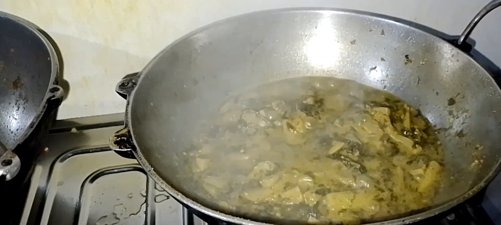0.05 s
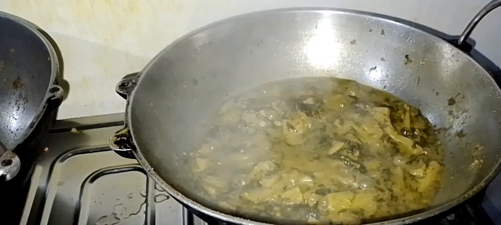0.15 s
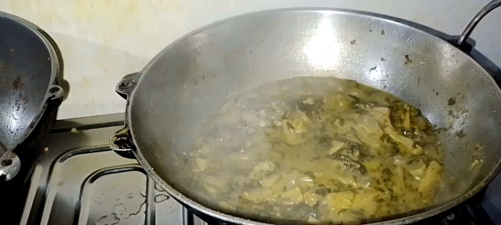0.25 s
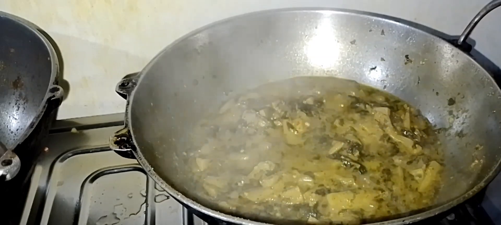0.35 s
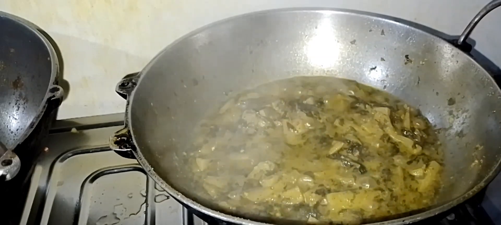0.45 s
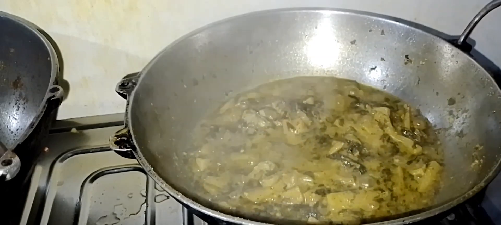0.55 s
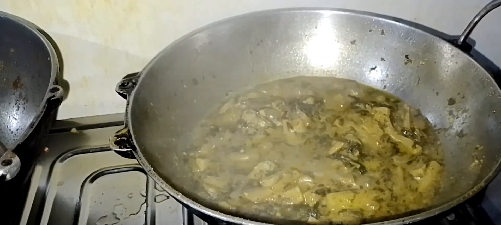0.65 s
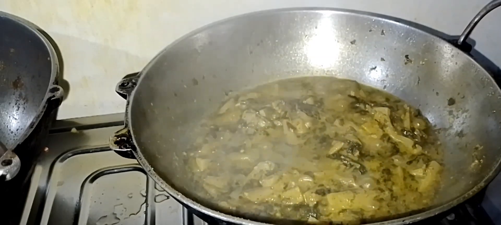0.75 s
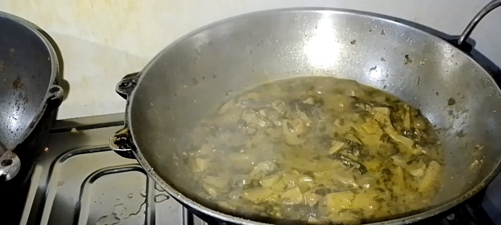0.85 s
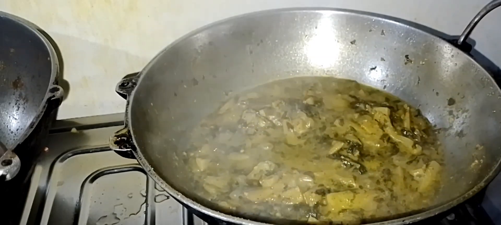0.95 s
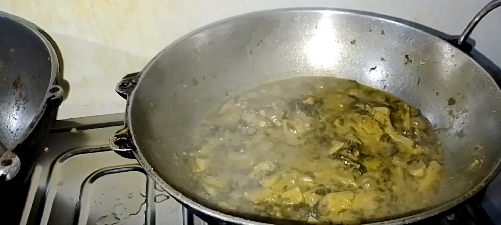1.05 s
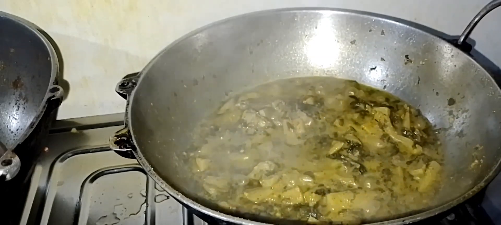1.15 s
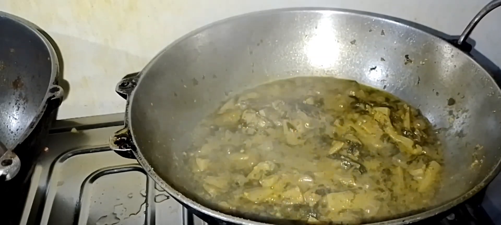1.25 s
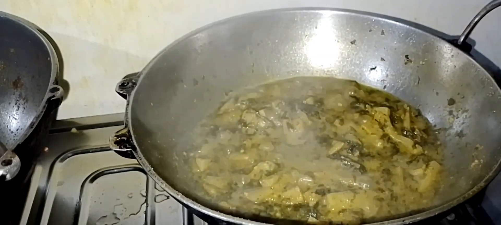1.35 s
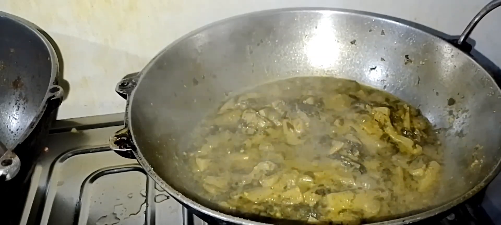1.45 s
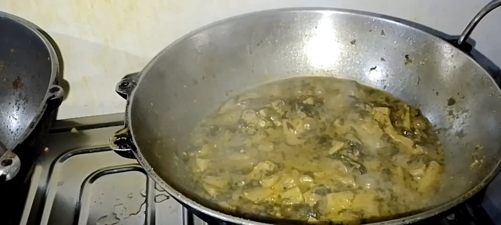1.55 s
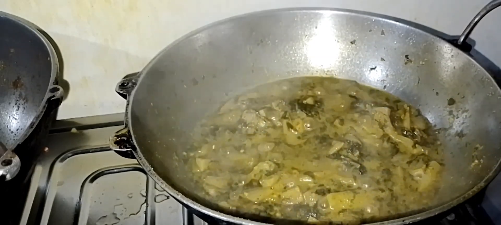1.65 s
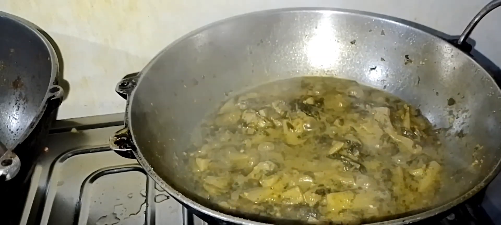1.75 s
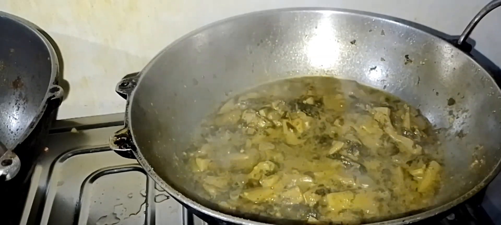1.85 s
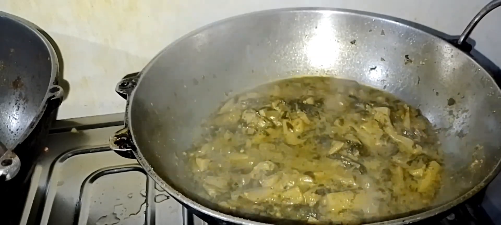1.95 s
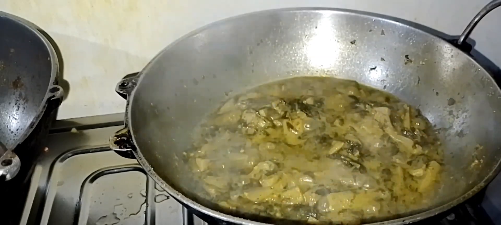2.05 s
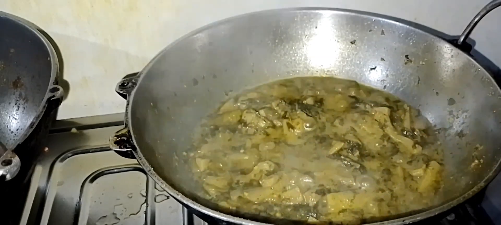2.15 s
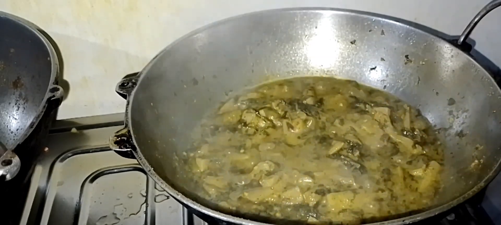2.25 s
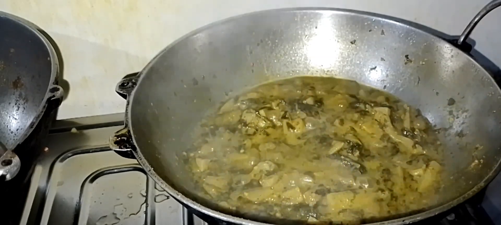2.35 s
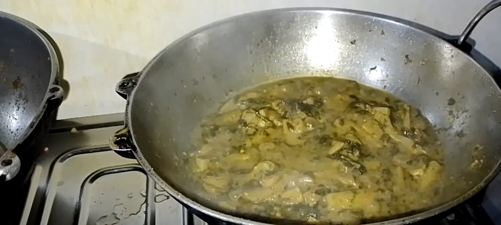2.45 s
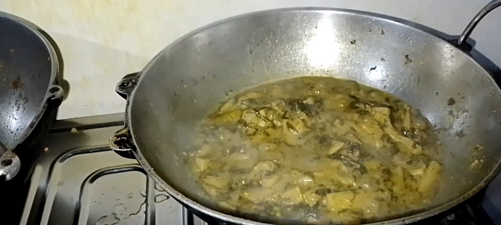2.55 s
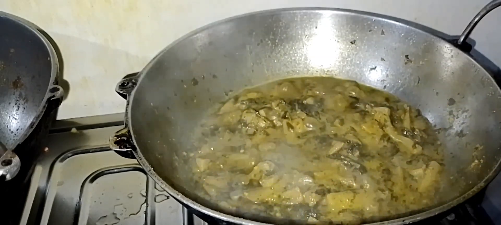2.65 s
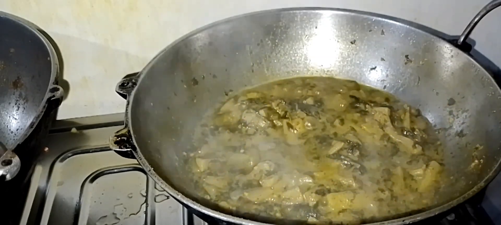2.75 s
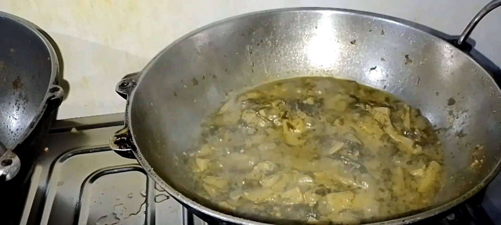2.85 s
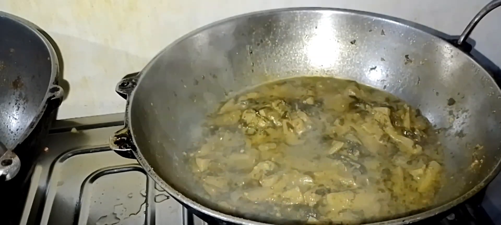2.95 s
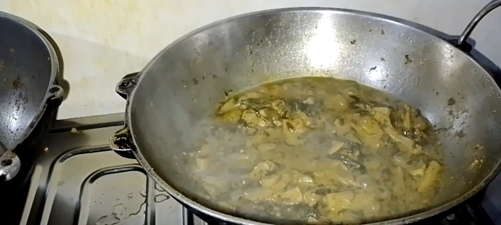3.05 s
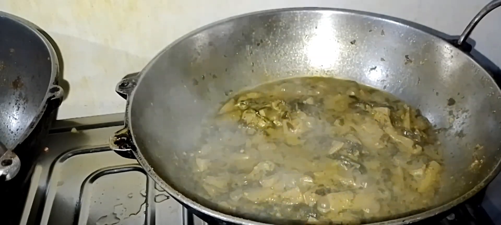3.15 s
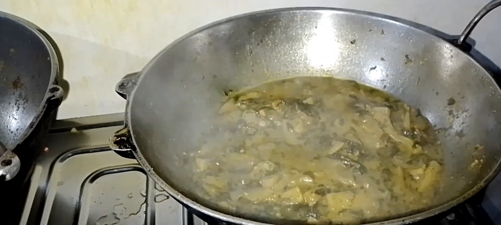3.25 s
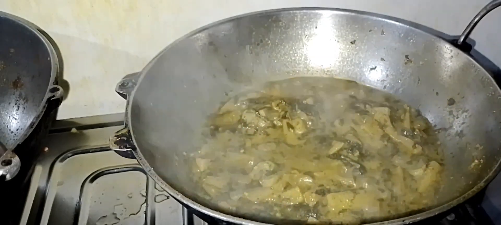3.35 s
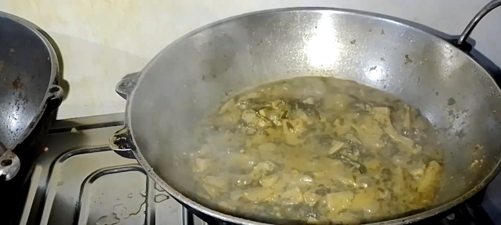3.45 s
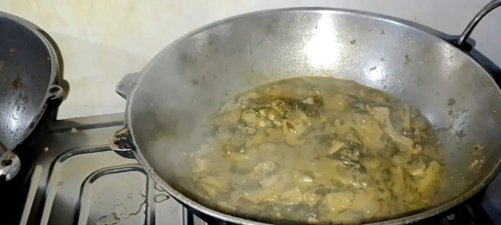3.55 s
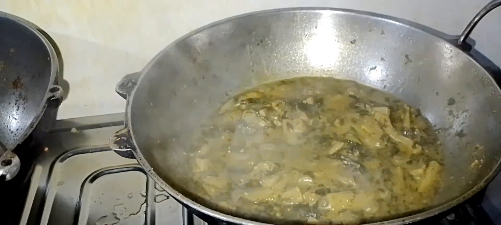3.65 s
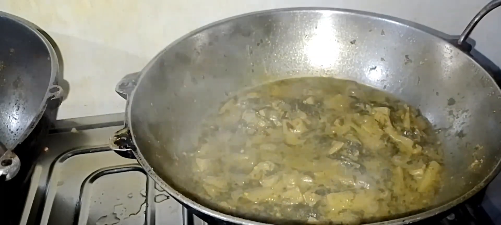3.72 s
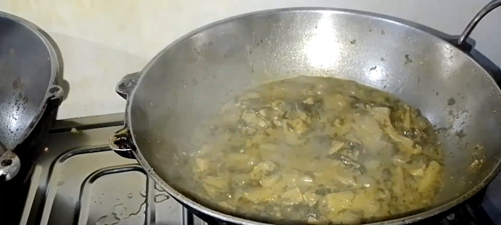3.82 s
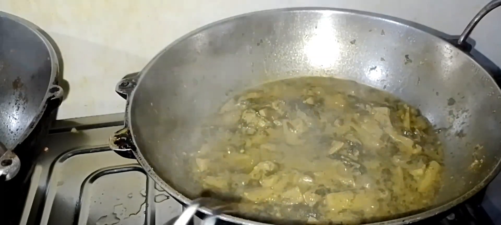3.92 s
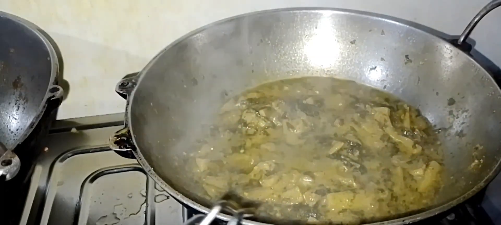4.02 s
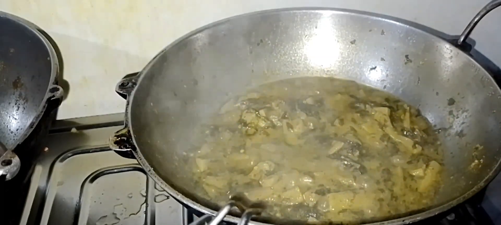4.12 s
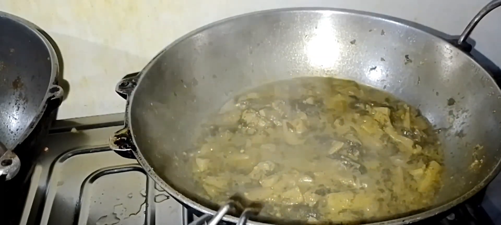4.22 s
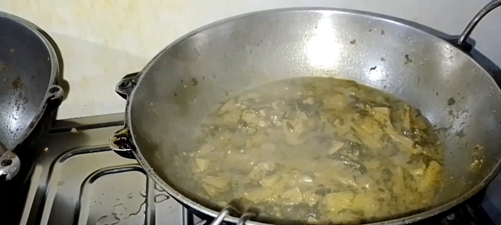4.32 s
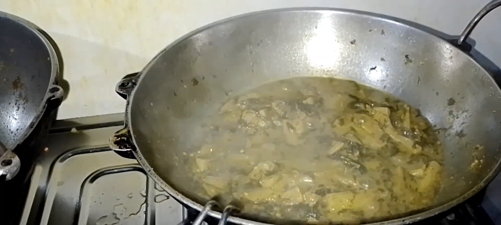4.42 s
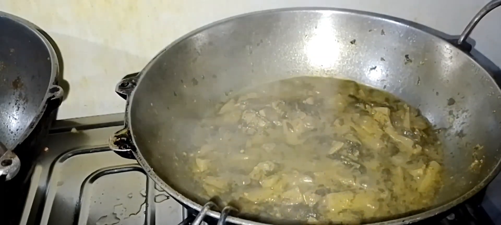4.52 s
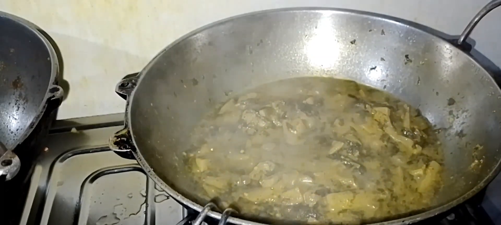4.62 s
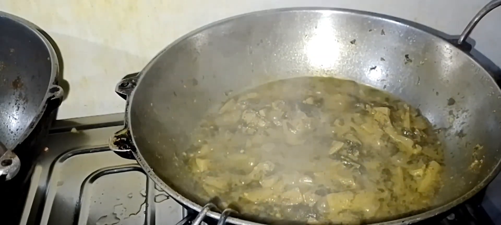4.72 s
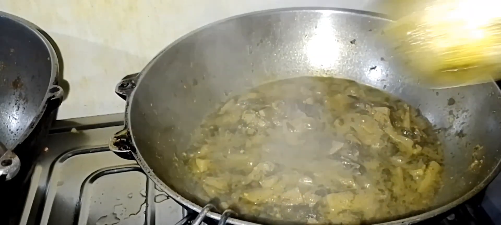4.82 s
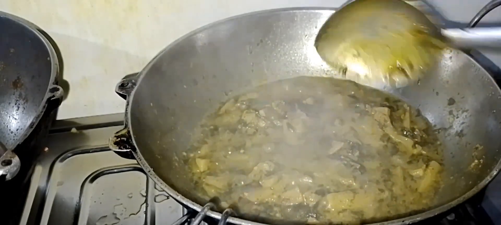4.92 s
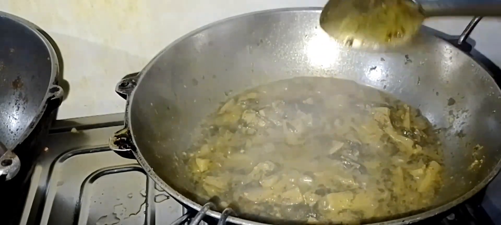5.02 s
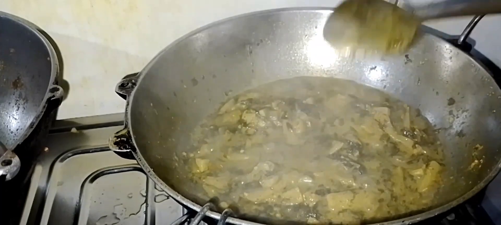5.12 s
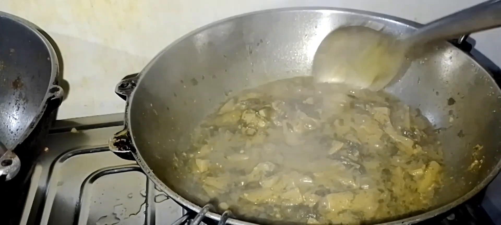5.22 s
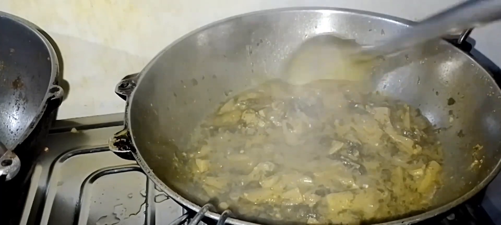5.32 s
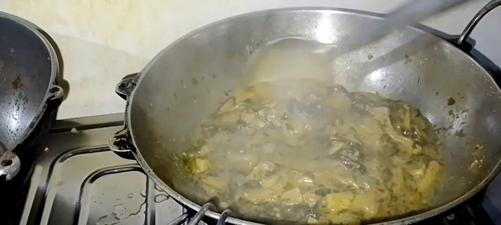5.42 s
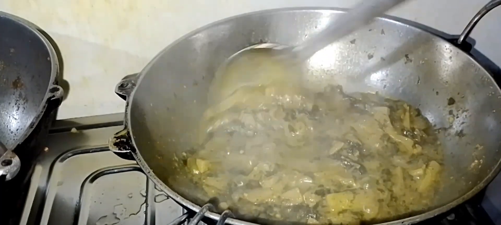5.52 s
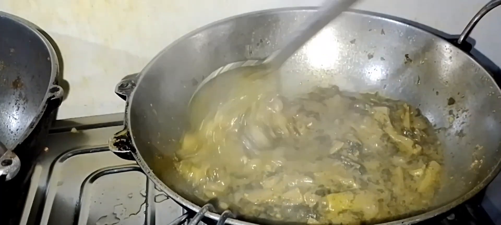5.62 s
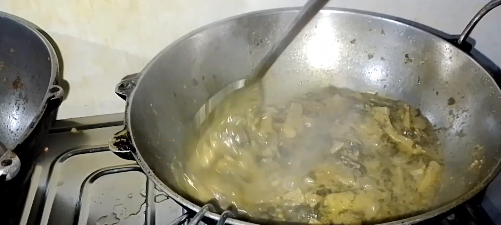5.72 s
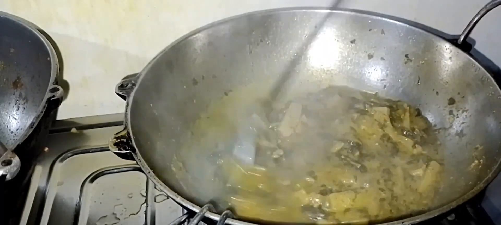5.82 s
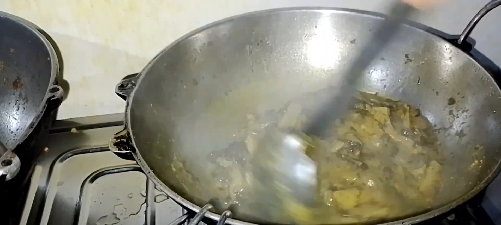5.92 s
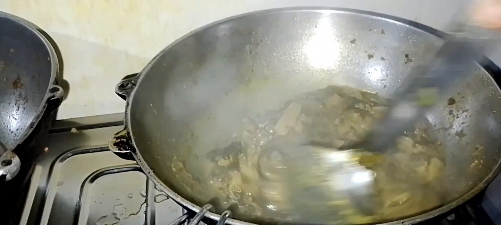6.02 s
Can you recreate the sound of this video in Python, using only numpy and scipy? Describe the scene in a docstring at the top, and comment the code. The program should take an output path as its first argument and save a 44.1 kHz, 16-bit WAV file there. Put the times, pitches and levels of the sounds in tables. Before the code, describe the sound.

Thick curry crackles and pops over a steady burner hiss, distant steel clangs, then a ladle rattles off the stove and scrapes through the wok.

```python
"""Curry simmers in a steel wok, close to the microphones: wavelets tick as fat spits at two spots, bubbles pop.
A ladle is snatched rattling from the stove top (noise cracks, ringing modes) and scrapes through the wok (gritty
noise in sinking resonances). The sheet-metal top booms, and the hand jars the recorder.
Further off, steel ware clangs in a noisy wash; a thin whistle swells, and shaped noise makes the steady hiss.
A small recorder with two unlike microphone ports stands close by."""
import sys
import numpy as np
from scipy import signal
from scipy.fft import rfft, irfft, next_fast_len
from scipy.io import wavfile
from scipy.ndimage import uniform_filter1d, map_coordinates

SR = 44100
rng = np.random.default_rng(int(sys.argv[2]) if len(sys.argv) > 2 else 0)


def dump(signal):
    """Clip the signal to [-1, 1] and save it as 16-bit WAV at the path in sys.argv[1]."""
    limited = np.clip(np.atleast_2d(signal).T, -1, 1)
    pcm = np.round(limited * 32767).astype(np.int16)
    wavfile.write(sys.argv[1], SR, pcm)


def boost_factor(decibels):
    """Convert a level in decibels to a linear amplitude factor."""
    exponent = np.asarray(decibels, float) / 20
    return 10 ** exponent


N = 268065

# ladle contacts on the stove top: (time [s], level [dB], relative lows [dB], left over right [dB])
LADLE_CONTACTS = [(4.1728, -29, -24.5, -0.5), (4.2917, -19.5, -27.5, 3), (4.3085, -28.5, -29.5, 19.5),
                  (4.3242, -26, -18.5, -4), (4.3693, -10.5, -31.5, 1), (4.3755, -43, -12, -15),
                  (4.3822, -27, -11.5, 3), (4.4045, -11, -21, 2.5), (4.4236, -33, -1.5, -5.5),
                  (4.5306, -32, -17, -2.5), (4.5795, -40.5, -35, 5)]
# pressure of the ladle stroke, as its rasp: (time [s], level [dB])
STROKE_PRESSURE = [(5.33, -80), (5.37, -58), (5.44, -53), (5.59, -40), (5.73, -42.5), (5.8, -40),
                   (5.92, -48.5), (5.98, -60), (6.08, -77.5)]
# left-right likeness of diffuse sound: (frequency [Hz], likeness [0-1])
LIKENESS = [(60, 1), (180, 0.99), (550, 0.73), (1650, 0.033), (4970, 0.12), (15000, 0.89)]


def unit(x):
    """Scaled to rms 1."""
    return x / np.sqrt(np.mean(x ** 2) + 1e-20)


def along(points, hz):
    """(Hz, value) points read on a log axis."""
    f, v = np.transpose(points)
    return np.interp(np.log(hz + 1), np.log(f + 1), v)


def curves(rows):
    """One dB value per sample for each column; silent outside the rows."""
    s, *cols = np.transpose(rows)
    return [np.interp(np.arange(N) / SR, s, c, left=-300, right=-300) for c in cols]


def wobble(rate):
    """A smooth random curve, rate knots a second."""
    knots = rng.standard_normal(int(N * rate / SR) + 4)
    return map_coordinates(knots, [np.arange(N) * rate / SR])


def filtered(x, response):
    """x times a complex response of frequency."""
    m = next_fast_len(x.shape[-1] + 8192)
    spectrum = rfft(x, m) * response(np.fft.rfftfreq(m, 1 / SR))
    return irfft(spectrum, m)[..., :x.shape[-1]]


def resonant(modes, floor_db):
    """Response of resonances (Hz, width Hz, dB) in alternating polarity over a flat floor."""
    def response(f):
        total = boost_factor(floor_db)
        for k, (centre, width, db) in enumerate(modes):
            peak = 1j * f * width / (centre * centre - f * f + 1j * f * width)
            total = total + (-1) ** k * boost_factor(db) * peak
        return total
    return response


def shelf(low_db, corner_hz, order=4):
    """Lifts or drops everything below the corner."""
    return lambda f: boost_factor(low_db / (1 + (f / corner_hz) ** order))


def noise(response, alike, length=N):
    """Stereo noise of rms 1; the sides share a part."""
    def mid_side(hz):
        turn = np.arccos(np.clip(alike(hz), -1, 1)) / 2
        return response(hz) * [np.cos(turn), np.sin(turn)]
    mid, side = filtered(rng.standard_normal((2, length)), mid_side)
    return unit(np.array([mid + side, mid - side]))


def sides(pan_db):
    """Left and right gains; positive leans left."""
    return boost_factor(np.array([pan_db, -pan_db]) / 2)


def streaky(x, depth_db):
    """Thin bands swell and fade on their own for a tenth of a second."""
    z = signal.stft(x, nperseg=1024)[2]
    field = uniform_filter1d(rng.standard_normal(z.shape[1:]), size=3, axis=0)
    field = uniform_filter1d(field, size=8, axis=1)
    return unit(signal.istft(z * boost_factor(depth_db * unit(field)), nperseg=1024)[1][:, :x.shape[1]])


def dying(s, db, rise, t60):
    """The summed strength of events that rise quickly and die away."""
    t = np.maximum(np.arange(N) / SR - np.reshape(s, (-1, 1)), 0)
    decay = boost_factor(np.reshape(db, (-1, 1)) - 60 * t / np.reshape(t60, (-1, 1)))
    each = decay * (1 - np.exp(-t / rise))
    return np.sqrt(np.sum(each ** 2, axis=0))


def ring(modes, t, split):
    """Round steel rings in close, beating pairs, struck at new strengths and phases on each side."""
    hz, db, t60 = np.tile(np.transpose(modes), 2)[:, :, None]
    level, phase = rng.standard_normal((2, 2, len(hz), 1))
    hz = hz * (1 + split * rng.standard_normal(hz.shape))
    decay = boost_factor(db + 2 * level - 60 * t / t60)
    return np.sum(decay * np.sin(2 * np.pi * hz * t + 2 * phase), axis=1)


def echoes(length):
    """A fresh room tail, scaled to energy 1 on the left: each frequency dies at its own speed."""
    # how long the kitchen rings: (frequency [Hz], t60 [s])
    kitchen_t60 = [(300, 0.57), (2000, 0.54), (8000, 0.33), (14000, 0.58)]
    flat = noise(lambda f: 1, lambda f: along(LIKENESS, f), length)
    hz, t, z = signal.stft(flat, SR, nperseg=256)
    decay = boost_factor(-60 * t / along(kitchen_t60, hz)[:, None])
    tail = signal.istft(z * decay, SR, nperseg=256)[1][:, :length]
    return tail / np.linalg.norm(tail[0])


def blips(s, hz, db, pan_db, cycles, glide=0):
    """Short swelling and dying wavelets, a few cycles each."""
    steps = np.arange(int(3 * cycles * SR / np.percentile(hz, 5)))
    turns = steps / SR * hz[:, None]
    u = turns / cycles
    wave = np.e * 3 * u * np.exp(-3 * u) * np.sin(2 * np.pi * turns * (1 + glide * u))
    at = (np.round(s * SR).astype(int)[:, None] + steps).ravel()
    gains = boost_factor(db) * sides(pan_db)
    return np.array([np.bincount(at, (wave * g[:, None]).ravel(), 2 * N)[:N] for g in gains])


def spitting(count, hz, spread, size_db, pan_db, cycles):
    """Random ticks of rms 1: many small, few large, coming in clumps."""
    when, size = rng.random((2, count))
    pitch, pan = rng.standard_normal((2, count))
    db = -size_db * np.log(size + 1 / 40)
    ticks = blips(when * N / SR, hz * np.exp(spread * pitch), db, pan_db + 3 * pan, cycles)
    return unit(ticks * boost_factor(2.8 * wobble(30) + wobble(8)))


def wok_wall(ticks):
    """The far wall sends each tick back once, 2.6 ms late; nothing dull gets out."""
    def response(f):
        bounce = 1 + 0.34 * np.exp(-2j * np.pi * f * 0.0026)
        return bounce / (1 + (4300 / (f + 1)) ** 16)
    return filtered(ticks, response)


def sizzle():
    """Fat spits in tiny ticks at two spots, with a thin scatter of brighter ticks."""
    # spitting near each port: (time [s], right spot level [dB], left spot level [dB])
    spot_levels = [(0.0, -54, -60.5), (0.5, -53.5, -63), (1.3, -51.5, -61), (1.7, -59.5, -65),
                   (2.25, -57.5, -62.5), (2.7, -58.5, -64.5), (2.95, -65.5, -64.5), (4.8, -67, -63.5),
                   (6.08, -66, -61)]
    right_db, left_db = curves(spot_levels)
    right = boost_factor(right_db) * spitting(count=7000, hz=5800, spread=0.09, size_db=5.5, pan_db=-48, cycles=4.5)
    left = boost_factor(left_db) * spitting(count=7000, hz=7780, spread=0.054, size_db=5.5, pan_db=4, cycles=6.4)
    scatter = boost_factor(-75) * spitting(count=1400, hz=8500, spread=.2, size_db=3, pan_db=3, cycles=1.6)
    return wok_wall(right) + left + scatter


def loud_spits():
    """Single louder wavelets: dull spits come from the right spot, bright ones from the left."""
    # louder single spits: (time [s], level [dB], frequency [Hz])
    spit_events = [(0.092, -43, 5750), (0.275, -39.5, 5500), (0.295, -39, 5900), (0.3731, -39.5, 5970),
                   (0.451, -42, 5200), (0.4948, -44, 5300), (0.558, -41.5, 5950), (0.6582, -40, 6130),
                   (0.695, -40.5, 6000), (0.839, -43, 6250), (0.8645, -38, 6300), (1.117, -35.5, 6100),
                   (1.14, -38.5, 8200), (1.1839, -42.5, 6296), (1.9167, -43, 5930), (2.224, -50, 5930),
                   (2.27, -37.5, 5860), (2.2915, -42.5, 5800), (2.415, -40.5, 6000), (2.4676, -41.5, 5470),
                   (2.7487, -46, 5300), (3.0147, -44.5, 7600), (3.548, -43, 7800), (5.1888, -40.5, 8000),
                   (5.671, -26.5, 7450)]
    s, db, hz = np.transpose(spit_events)
    pan_db = np.where(hz > 6900, 14, -15)
    return wok_wall(blips(s, hz, db, pan_db, cycles=6.6))


def bubbles():
    """Bubbles pop in the thick gravy: each closing cavity rises in pitch, over a patter of small ones."""
    # larger bubbles: (time [s], level [dB], starting frequency [Hz])
    pop_events = [(0.4059, -56.5, 2600), (0.8455, -60, 2580), (1.179, -55.5, 2000), (1.291, -50.5, 1070),
                  (1.404, -60, 1130), (1.408, -59, 2070), (2.2307, -60.5, 2220), (2.3651, -62.5, 603),
                  (2.401, -61.5, 1660), (4.818, -61, 1550), (5.166, -54, 2600)]
    s, db, hz = np.transpose(pop_events)
    large = blips(s, hz, db, 0 * s - 2.5, cycles=8.4, glide=0.051)
    small = boost_factor(-76) * spitting(count=1500, hz=2190, spread=0.47, size_db=2.5, pan_db=-10.0, cycles=1.2)
    return large + small


def rattle():
    """Each contact cracks, rings the ladle briefly and stirs the room."""
    # the ladle's ringing modes: (frequency [Hz], relative level [dB], t60 [s])
    ladle_modes = [(1798, 2.5, 0.053), (2355, 3.5, 0.042), (2780, -14.5, 0.15), (3250, -3, 0.096),
                   (4700, -2.5, 0.16), (5200, 6, 0.053), (6000, -18, 0.068), (6350, -15, 0.087),
                   (7500, -8, 0.26), (7200, -22, 0.08), (7460, -6.5, 0.11), (7820, 1, 0.17)]
    # the bright crack of a contact: (frequency [Hz], relative level [dB per Hz])
    crack_colour = [(2350, -12.5), (4000, -21), (5500, -10.5), (5970, 0), (7570, -7.5), (9010, -13),
                    (10500, -17.5), (16000, -56)]
    out, t = np.zeros((2, N + SR)), np.arange(SR // 3) / SR
    crack_decay = boost_factor(-60 * t / 0.016) + boost_factor(-13 - 60 * t / 0.18)

    def colour(f):
        floor_db = np.where((f > 1100) & (f < 6000), -14, -60)
        return boost_factor(np.maximum(along(crack_colour, f), floor_db))

    for s, db, low_db, pan_db in LADLE_CONTACTS:
        tone = lambda f: shelf(low_db + 14, corner_hz=3800)(f) / (1 + (900 / (f + 1)) ** 4)
        crack = noise(colour, lambda f: 0.3 + 0 * f, len(t)) * crack_decay
        blow = crack + boost_factor(-19.5) * ring(ladle_modes, t, split=0.0098)
        blow = blow * (1 - np.exp(-t / 0.00058))
        blow = filtered(blow, tone) * sides(pan_db)[:, None]
        # only the first 45 ms of a blow feed the room
        wet = signal.fftconvolve(blow[:, :2000], echoes(len(t)), axes=1)[:, :len(t)]
        out[:, round(s * SR):][:, :len(t)] += boost_factor(db) * (blow + boost_factor(-12.5) * wet)
    return out[:, :N]


def sinking(response, alike, rise):
    """Noise whose resonances slide down as the ladle sinks into the gravy."""
    deep, shallow = [noise(lambda f: response(f / k), lambda f: alike + 0 * f) for k in (1, rise)]
    turn = np.clip((np.arange(N) / SR - 5.45) / 0.29, 0, 1) * np.pi / 2
    return streaky(np.sin(turn) * deep + np.cos(turn) * shallow, depth_db=4.0)


def scrape():
    """The ladle's edge catches and slips on the wall: gritty noise into the wok's resonances."""
    # wok wall under the edge: (frequency [Hz], width [Hz], level [dB])
    wall_modes = [(4220, 260, -13.5), (5320, 390, -7.5), (5630, 18, -2), (6300, 160, -4.5), (7770, 54, 7.5),
                  (8060, 165, 2)]
    # wok body with the ladle deep: (frequency [Hz], width [Hz], level [dB])
    body_modes = [(600, 53, -1.5), (705, 82, -0.5), (1075, 79, 8.5), (1440, 140, 2.5), (1660, 380, -5),
                  (2500, 220, -3.5), (3230, 1200, -11.5)]
    rasp_db, = curves(STROKE_PRESSURE)
    # the body is at -51 dB when the rasp is at -41 dB, and swings less than it
    body_db = -51 + 0.47 * (rasp_db + 41)
    grit = boost_factor(1.97 * wobble(70) + 1.1 * wobble(400))
    wall, wok = resonant(wall_modes, -17.5), resonant(body_modes, -32)
    wall_band = lambda f: wall(f) / (1 + (3900 / (f + 1)) ** 8 + (f / 9500) ** 6)
    body_band = lambda f: wok(f) ** 1.1 / (1 + (550 / (f + 1)) ** 8 + (f / 3600) ** 8)
    rasp = unit(grit * sinking(wall_band, 0.17, rise=1.03))
    body = sinking(body_band, 0.29, rise=1.153)
    rasp = boost_factor(rasp_db) * rasp * sides(2.1)[:, None]
    return rasp + boost_factor(body_db + wobble(50)) * body * sides(-4)[:, None]


def stove():
    """The sheet-metal top booms near one pitch when struck, pushed or loaded through the wok."""
    # soft pushes on the stove top: (time [s], boom level [dB])
    pushes = [(4.759, -63), (5.159, -62)]
    panel = resonant([(298.0, 74, -3.5), (398, 70, 5.0), (469, 320, -2.5)], -64)
    # each contact booms 10.5 dB under its own lows
    blows = [(s, db + low_db - 10.5) for s, db, low_db, _ in LADLE_CONTACTS] + pushes
    struck = dying(*np.transpose(blows), rise=.02, t60=0.36)
    pressure_db, = curves(STROKE_PRESSURE)
    since_start = np.arange(N) / SR - STROKE_PRESSURE[0][0]
    # against the rasp, the boom grows 24 dB a second as the ladle loads the wok
    leaning = boost_factor(pressure_db - 21.5 + 24 * since_start)
    boom = noise(lambda f: panel(f) ** 2, lambda f: 0.9 + 0 * f)
    return (struck + leaning) * boom


def jolts():
    """The hand jars the recorder: low resonant thumps, almost all in the left port."""
    # jars of the recorder: (time [s], level [dB], t60 [s])
    jars = [(4.385, -68, 0.11), (5.346, -76.5, .5), (5.46, -66.5, 0.17)]
    case = resonant([(70.6, 104, 0.0), (148, 79, 0)], -60)
    thump = noise(lambda f: case(f) ** 2, lambda f: 0.25 + 0 * f) * sides(31)[:, None]
    s, db, t60 = np.transpose(jars)
    return dying(s, db, 0.0091, t60) * thump


def clangs():
    """Far blows arrive smeared by the walls: a wash that swells and dies by band, with the pot's ring inside."""
    # far blows: (time [s], level [dB], gain of the lows [dB], contact length [s], ring over wash [dB])
    far_blows = [(0.164, -40, -25, 0.0028, -16), (0.605, -61.5, 2, 0.0023, -10),
                 (0.89, -25.5, 2, 0.034, -11.5), (1.25, -52.5, 2.5, 0.017, -6.5),
                 (2.576, -50, -56, 0.0034, -15.5), (5.145, -52, -17, 0.0038, -17.5)]
    # the far steel ware: (frequency [Hz], relative level [dB], t60 [s])
    pot_modes = [(528, -10, 0.31), (674, -4, 0.26), (994, -3, 0.65), (1022, 0.5, 0.39), (1445, -8, 0.43),
                 (2490, -2, 0.26), (2720, -3, 0.31), (3210, -11.5, 0.54), (7600, 8.5, 0.43),
                 (3500, -1, 0.42)]
    # its noisy wash: (frequency [Hz], relative level [dB per Hz])
    wash_colour = [(200, -55), (350, -8.5), (465, -6), (880, -7), (3150, -9), (3750, -13.5), (4300, -6),
                   (5600, -1.5), (6800, -0.5), (7600, 4.5), (8800, -0.5), (11000, -18), (16000, -34.5)]
    out, t = np.zeros((2, N + SR)), np.arange(SR // 2) / SR
    for s, db, low_db, contact, ring_db in far_blows:
        swell = 1 - np.exp(-(t / contact) ** 1.84)
        wash = filtered(echoes(len(t)), lambda f: boost_factor(along(wash_colour, f)))
        wash = wash / np.std(wash[:, :2000])
        blow = swell * (wash + boost_factor(ring_db) * ring(pot_modes, t, split=.012))
        blow = filtered(blow, shelf(low_db, corner_hz=1903.94, order=8))
        out[:, round(s * SR):][:, :len(t)] += boost_factor(db) * blow
    return out[:, :N]


def whistle():
    """A thin wavering whistle in swells: a fuzzy narrow band, mostly on the right."""
    # swells: (time [s], level [dB], frequency [Hz])
    swells = [(4.59, -66, 3930), (4.859, -75.5, 3880), (5.088, -62, 4010), (5.32, -68, 4030),
              (5.7, -62.5, 4030), (5.931, -58.5, 4040)]
    s, db, hz = np.transpose(swells)
    t = np.arange(N) / SR
    # each swell rises and falls at 142 dB a second
    level = boost_factor(db[:, None] - 142 * abs(t - s[:, None])).sum(axis=0) * (t > s[0] - .04)
    fuzz = noise(lambda f: 1 / (1 + (f / 170) ** 4), lambda f: .3 + 0 * f)
    tone = np.sin(2 * np.pi * np.cumsum(np.interp(t, s, hz)) / SR)
    return level * fuzz * tone * sides(-19.5)[:, None]


def hiss():
    """Burner and kitchen: a steady floor of shaped noise, shimmering slightly."""
    # colour of the floor: (frequency [Hz], relative level [dB per Hz])
    floor_colour = [(18, -26), (35, -17), (70, -18), (130, -32), (180, -32), (300, -9), (450, -11),
                    (620, -15), (800, -13), (1000, -17), (1700, -14), (3000, -16), (4300, -13), (5600, -6),
                    (7900, -3), (10000, -13), (16000, -28)]
    floor = noise(lambda f: boost_factor(along(floor_colour, f)), lambda f: along(LIKENESS, f))
    return boost_factor(-61.5) * streaky(floor, depth_db=1.8)


def scene():
    """Everything on and around the stove, from the curry to the kitchen behind it."""
    curry = sizzle() + loud_spits() + bubbles()
    ladle = rattle() + scrape() + stove() + jolts()
    return curry + ladle + clangs() + whistle() + hiss()


def low_pass(x):
    """Removes everything above the highest recorded frequency."""
    return signal.sosfilt(signal.butter(12, 16450, fs=SR, output="sos"), x)


def record(dry):
    """The two ports colour the sound differently; the top is cut and the zero sits slightly low."""
    # left port over right port: (frequency [Hz], level [dB])
    port_gap = [(100, 6.5), (300, -2), (500, 1.5), (1000, -0.5), (2000, -0.5), (3500, -4), (5000, -4),
                (5900, -5), (7000, 4), (8400, 3.5), (10200, -2), (12400, 1.5), (15000, 11.5)]
    top_hz, zero_offset = 15830, -.0002
    ports = lambda f: sides(along(port_gap, f)) * boost_factor(-26 * (f > top_hz))
    mix = filtered(dry, ports) + zero_offset
    return low_pass(mix)


dry = scene()
out = record(dry)
dump(out)
```